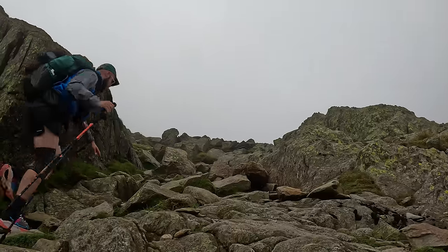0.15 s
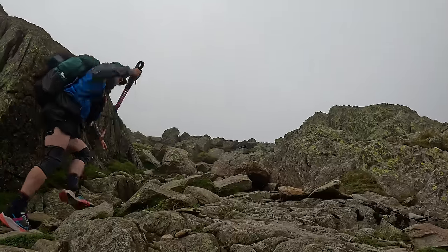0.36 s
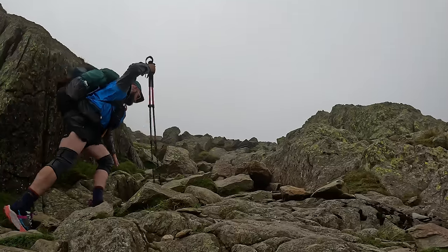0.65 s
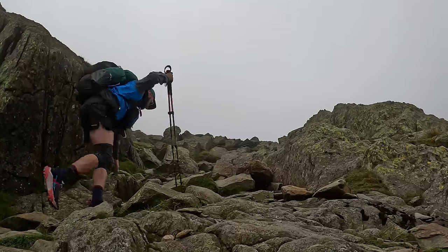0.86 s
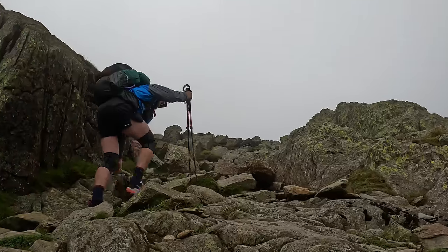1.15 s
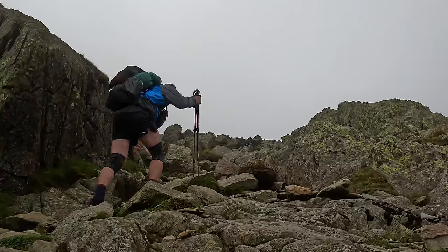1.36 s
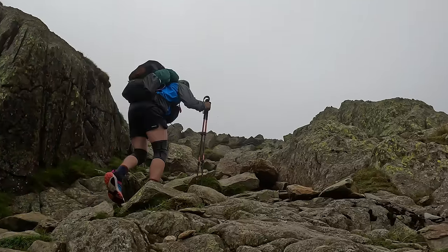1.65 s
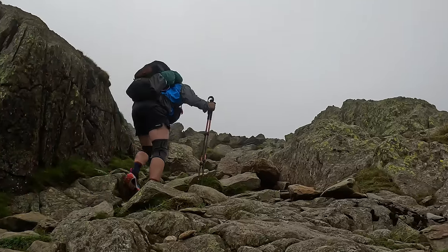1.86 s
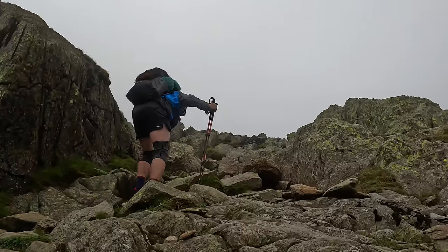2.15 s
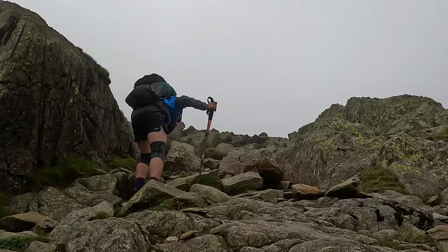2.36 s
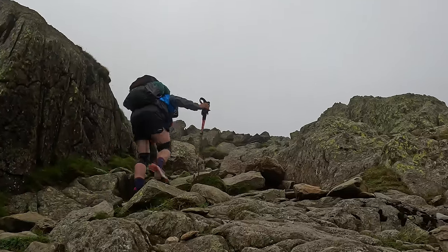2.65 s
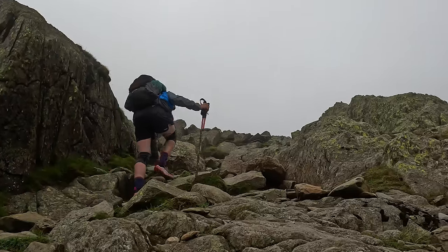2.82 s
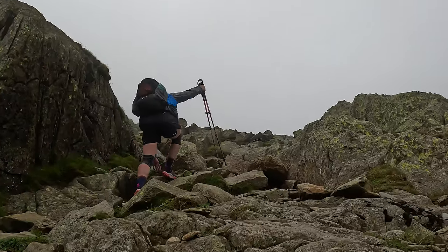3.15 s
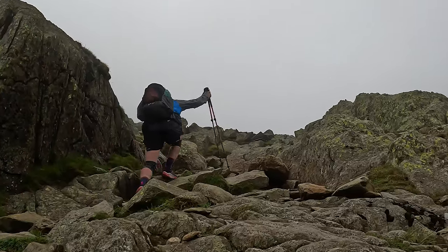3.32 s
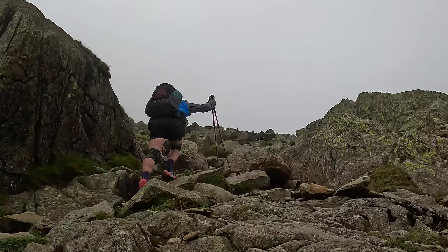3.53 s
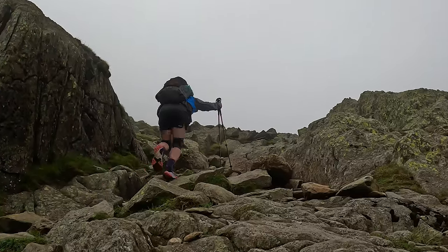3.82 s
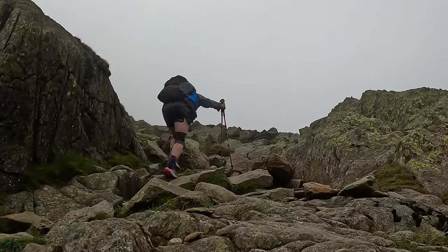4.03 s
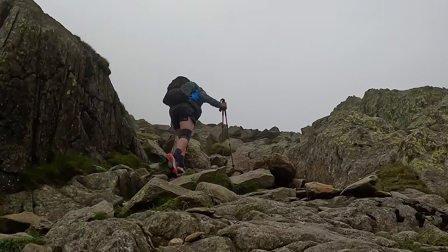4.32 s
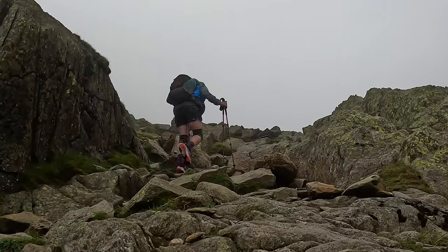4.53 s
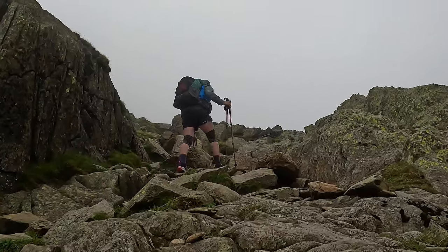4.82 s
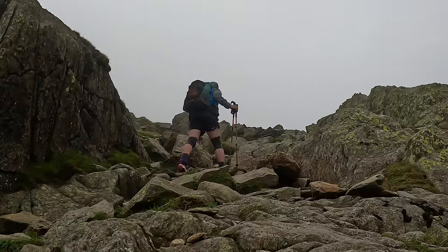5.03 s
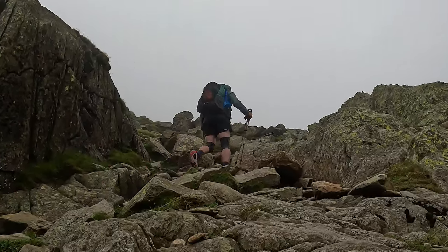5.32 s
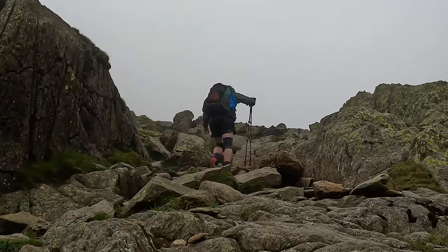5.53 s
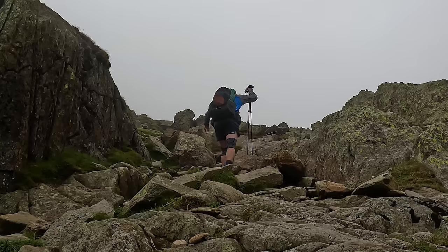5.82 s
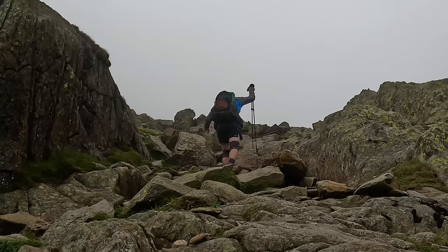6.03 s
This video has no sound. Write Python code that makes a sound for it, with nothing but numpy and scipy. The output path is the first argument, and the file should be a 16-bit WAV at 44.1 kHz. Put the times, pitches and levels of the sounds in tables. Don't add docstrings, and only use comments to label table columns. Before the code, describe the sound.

Outdoor boulder field, small camera on the ground, walker starting close on the left and moving toward the centre. From 0 to 0.3 s, pole tips tick and skip on stone, with a loud clack near 0.2, over nylon jacket and pack swishes and low rock rumble. Around 0.5-0.8 s come another hard pole strike, thuds, sole scrapes and crunching grit. At 1.1 s a boot and pole land together; near 1.4 s a heavy boulder knock brings gritty scuffs. From 1.8 to 3.2 s mainly rustle, duller steps, slides and pebble ticks. About 3.35 s a deep footfall and bright pole click stand out, then small shaft bumps. Two heel stamps with scuffing arrive around 4.3 s, softer steps and a pole tap near 5.1 s, and faint grit crunches at 5.9 s. Short rocky echoes, faint hiss, treble fading with distance.

```python
import sys
import numpy as np
from scipy import signal
from scipy.fft import rfft, irfft, next_fast_len
from scipy.io import wavfile
from scipy.ndimage import uniform_filter1d, map_coordinates

SR = 44100
rng = np.random.default_rng(int(sys.argv[2]) if len(sys.argv) > 2 else 0)


def unload_audio(sound):
    columns = np.transpose(np.atleast_2d(sound))
    steps = np.round(np.clip(columns, -1, 1) * 32767)
    wavfile.write(sys.argv[1], SR, steps.astype(np.int16))


def elevation(decibels):
    levels = np.asarray(decibels, float)
    return 10 ** (levels / 20)


N = 272272

# hz, level_db
CRACK_SPECTRUM = [(1500, -61.5), (3000, -9.5), (4200, -3), (6000, -6), (8500, -12.5), (11000, -27),
                  (16000, -74)]
CLACK_DB, CLACK_GROWS = 1.5, 0.63
DRAG_CLACK_DB, DRAG_CLACK_GROWS = 0.8, 0.5


def unit(x):
    return x / np.sqrt(np.mean(x ** 2) + 1e-20)


def along(points, hz):
    f, v = np.transpose(points)
    return np.interp(np.log(hz + 1), np.log(f + 1), v)


def curves(rows):
    s, *cols = np.transpose(rows)
    return [np.interp(np.arange(N) / SR, s, c) for c in cols]


def wobble(rate):
    knots = rng.standard_normal(int(N * rate / SR) + 4)
    return map_coordinates(knots, [np.arange(N) * rate / SR])


def filtered(x, response):
    n = x.shape[-1]
    m = next_fast_len(n + 8192)
    return irfft(rfft(x, m) * response(np.fft.rfftfreq(m, 1 / SR)), m)[..., :n]


def noise(spectrum, shape):
    return unit(filtered(rng.standard_normal(shape), lambda hz: elevation(along(spectrum, hz))))


def rush(spectrum, grain_db, grain_hz, apart):
    # hz, correlation
    alike = [(60, 0.29), (180, 0.8), (550, 0.95), (4970, 0.89), (15000, 0.4)]
    pair = rng.standard_normal((2, N)) * elevation(grain_db * wobble(grain_hz))

    def mid_side(hz):
        turn = np.arccos(np.clip(along(alike, hz) - apart, -1, 1)) / 2
        return elevation(along(spectrum, hz)) * [np.cos(turn), np.sin(turn)]

    mid, side = filtered(pair, mid_side)
    return unit(np.array([mid + side, mid - side]))


def ringing(modes, t, scatter_db, detune, spread=1):
    hz, db = np.transpose(modes)
    chance = rng.standard_normal((3, len(hz)))
    phase = 2 * np.pi * (np.outer(t, hz * (1 + detune * chance[0])) + spread * chance[1])
    return unit(np.sin(phase) @ elevation(db + scatter_db * chance[2]))


def add(track, s, sound):
    track[round(s * SR):][:len(sound)] += sound


def swells(s, db, rise_s, fall_s, rest_db):
    grid = np.arange(0, N + 64, 64) / SR
    late = grid[:, None] - s
    efforts_db = db - 10 * np.maximum(late / fall_s, -late / rise_s)
    power = elevation(rest_db) ** 2 + (elevation(efforts_db) ** 2).sum(1)
    return np.interp(np.arange(N) / SR, grid, np.sqrt(power))


def cloth():
    # peak_s, swish_db, hiss_over_swish_db, fall_10db_s
    reaches = [(.1, -49, -1.5, 0.52), (0.649, -46.5, -2.5, 0.2845), (.95, -51.5, 0, 0.3529),
               (1.55, -52.5, 0.5, 0.11), (1.832, -49.5, -2, 0.03), (2.44, -50.5, -4.5, 0.17),
               (2.62, -59, 2.5, 0.3), (2.9, -49, -1.5, .2), (3.72, -53.5, -1.5, 0.43),
               (4.008, -52, -2.5, -0.32), (4.6, -62, 3, .1), (5.42, -64, -4.5, 0.26), (5.78, -65, 5, 0.1),
               (1.95, -70, 9, 0.08)]
    # peak_s, swish_db, hiss_over_swish_db, fall_10db_s
    jolts = [(1.09, -44.5, -3, 0.16), (1.35, -42, -7.5, 0.2458), (2.17, -55, -7, 0.4),
             (3.344, -46.5, -3, 0.2), (4.19, -51, -1.5, 0.2), (4.34, -53, -2.5, 0.16),
             (4.9, -60, -1.5, 0.75), (5.119, -47.5, -7, 0.22), (5.87, -54, -6, 1)]
    # hz, level_db_per_hz
    swish_spectrum = [(400, -62), (750, -31), (1050, 5), (1750, 5), (3300, -3.5), (4600, -11.5),
                      (9000, -120)]
    # hz, level_db_per_hz
    hiss_spectrum = [(2800, -21), (3900, -6.5), (5500, 1.5), (8000, -4), (10000, -9.5), (12600, -25),
                     (16000, -62)]
    jolt_rise_s, still_db = 0.018, -70
    hiss_lingers = 1.19
    s, db, hiss_db, fall_s = np.transpose(reaches + jolts)
    rise_s = np.where(np.arange(len(s)) < len(reaches), 0.976 * fall_s, jolt_rise_s)
    coarse = swells(s, db, rise_s, fall_s, still_db)
    fine = swells(s, db + hiss_db, hiss_lingers * rise_s, hiss_lingers * fall_s, still_db)
    folds = elevation(wobble(14))
    swish = coarse * folds * rush(swish_spectrum, grain_db=1.0, grain_hz=90.9, apart=0.21)
    hiss = fine * folds * rush(hiss_spectrum, grain_db=1.0, grain_hz=162.0, apart=0.043)
    return swish + hiss


def load():
    # peak_s, boom_db, rumble_db, grind_db
    shifts = [(.06, -44, -52, -58), (.2, -49, -61, -64), (.6, -49.5, -69.5, -53), (.68, -59.5, -49, -50.5),
              (1.13, -38, -49.5, -53), (1.4, -37, -60, -57), (1.48, -52.5, -48.5, -54),
              (1.82, -49.5, -61.5, -78), (2.221, -54.5, -54.5, -69.5), (2.52, -53, -56.5, -58),
              (2.88, -58, -70, -72), (3.02, -51.5, -53.5, -60), (3.388, -43, -44.5, -52),
              (4.26, -43, -69, -60.5), (4.62, -60, -72, -75), (5.12, -54, -47, -48),
              (5.32, -48, -55, -58.5), (5.56, -50, -67, -67), (5.72, -50, -71, -72), (5.91, -40, -50, -64),
              (6.09, -46, -52.5, -56)]
    # rise_10db_s, fall_10db_s, rest_db
    settling = [(0.02, 0.06, -75), (0.0846, 0.1031, -65), (0.08, 0.1119, -68)]
    # hz, level_db_per_hz
    boom_spectrum = [(50, -29), (72, 2), (105, 5.5), (140, 6), (190, -31), (400, -120)]
    # hz, level_db_per_hz
    rumble_spectrum = [(50, -53), (100, -32), (150, 1), (270, -1), (400, -14), (900, -120)]
    # hz, level_db
    grind_spectrum = [(200, -28), (330, -10), (500, 5), (800, 0), (1200, -9), (2500, -50.5), (5000, -88.5)]
    s, *levels_db = np.transpose(shifts)
    peaks_s = (s - 0.032, s, s)
    deep, low, rough = (swells(at, db, *law) for at, db, law in zip(peaks_s, levels_db, settling))
    sway = rush(boom_spectrum, grain_db=2.0, grain_hz=9.8, apart=-0.4)
    sway_power = np.abs(uniform_filter1d((sway ** 2).mean(0), SR // 20))
    boom = deep * sway / np.sqrt(sway_power + 0.13)
    rumble = low * rush(rumble_spectrum, grain_db=1.5, grain_hz=24.9, apart=0.024)
    grind = rough * rush(grind_spectrum, grain_db=3.0, grain_hz=69.0, apart=0.38)
    return boom + rumble + grind


def thuds(blows):
    out, t = np.zeros(N + SR), np.arange(SR // 2) / SR
    for s, db, hz, knock_db, knock_hz, t60 in blows:
        modes = [(0.741 * hz, -5), (0.872 * hz, -4), (hz, 0), (1.25 * hz, -4), (1.4 * hz, -5)]
        ground = ringing(modes, t, scatter_db=-2.0, detune=0.017, spread=0.131)
        swing = elevation(-3.5 - 60 * t / (0.9 * t60)) * (1 - np.exp(-t / 0.0043)) * ground
        hollow = [(0.25 * knock_hz, -50), (0.725 * knock_hz, -9), (knock_hz, 0),
                  (1.1 * knock_hz, -8), (2.0 * knock_hz, -18), (9 * knock_hz, -120)]
        knock_fade = elevation(knock_db + 4.5 - 60 * t / (0.74 * t60)) * (1 - np.exp(-t / 0.00179))
        add(out, s, elevation(db) * (swing + knock_fade * noise(hollow, len(t))))
    return out[:N]


def rocking_stones():
    # start_s, peak_db, ground_pitch_hz, knock_db, knock_hz
    wobbles = [(0.0, -46, 250, -8, 400), (0.21, -42, 260, -8, 420), (0.64, -34, 220, -12, 500),
               (0.688, -36, 250, -8, 600), (0.766, -24, 320, -14, 450), (1.095, -28, 150, -20, 450),
               (1.148, -33, 220, -10, 550), (1.35, -31, 220, -8, 550), (1.367, -28, 200, -8, 600),
               (1.394, -24.5, 230, -12, 550), (2.19, -29, 205, -18, 600), (2.457, -40, 300, -4, 550),
               (2.9, -49, 200, -8, 500), (3.172, -31, 280, -17, 500), (3.19, -34, 270, -14, 600),
               (3.315, -36, 180, -20, 400), (5.03, -39, 300, -4, 470), (5.14, -36, 280, -4, 600),
               (5.174, -43, 220, 0, 650), (5.232, -40, 250, -6, 600), (5.273, -35, 260, -14, 500),
               (5.665, -50, 250, -5, 550), (5.95, -40, 200, -8, 600)]
    return thuds([(*row, 0.08) for row in wobbles])


def clicks(blows):
    # hz, level_db
    shaft_modes = [(1090, -4), (1290, -2.5), (1430, -6.5), (1560, -0.5), (1740, 1), (2030, -19)]
    # hz, level_db
    stone_modes = [(2250, 1.5), (2500, -0.5), (2750, 2), (2990, -0.5), (3240, -0.5), (3480, -1)]
    out, t = np.zeros(N + SR), np.arange(SR // 6) / SR

    def fade(share, t60):
        return elevation(-60 * t / (share * t60)) * (1 - np.exp(-t / (0.019 * share * t60)))

    for s, db, hz, clack_db, crack_db, t60 in blows:
        jangle = elevation(1.74 * np.tanh(noise([(100, -3), (400, -6.5), (900, -61.5)], len(t))))
        struck = ringing(shaft_modes + [(hz, 4), (760, -14)], t, scatter_db=2.0, detune=0.0077)
        ring = elevation(-2) * fade(0.562, t60) * struck
        clack = elevation(clack_db - 0.5) * fade(0.72, t60) * ringing(stone_modes, t, scatter_db=3, detune=0.051)
        distant = [(f, g - 3.5 * (s - 1.5) * f / 1e4) for f, g in CRACK_SPECTRUM]
        tick_and_fizz = fade(0.15, t60) + elevation(-8.0) * fade(0.94, t60)
        crack = elevation(crack_db + 5.5) * tick_and_fizz * noise(distant, len(t))
        add(out, s, elevation(db) * (jangle * (ring + clack) + crack))
    return out[:N]


def contacts():
    # start_s, ring_db, main_ring_hz, hardness_db, t60_s
    tips = [(0.053, -31.5, 1700, 6.5, 0.022), (0.0762, -28, 1700, 4.5, 0.024),
            (0.1663, -23, 1710, 4, 0.044), (0.1833, -7.5, 1782, -10.5, 0.016),
            (0.291, -40.5, 1460, -1, 0.041), (0.516, -36.5, 1650, -1.5, 0.027),
            (0.6112, -8.5, 2040, -17, 0.044), (0.7562, -17, 1688, -12, 0.02),
            (0.9329, -40.5, 1960, 9, 0.0278), (1.0718, -11.5, 1290, -5.5, 0.046),
            (1.203, -31, 1330, -14.5, 0.027), (1.426, -29, 1293, -11, 0.09),
            (1.5208, -36, 1440, 0.5, 0.025), (1.564, -35.5, 1843, -9.5, 0.04),
            (3.3506, -10.5, 1759, -9, 0.026), (3.4228, -42.5, 2170, -4, 0.069),
            (3.449, -38, 1590, -10, 0.068), (3.6103, -32, 1766, -11.5, 0.05),
            (3.6728, -39, 1540, -10, 0.063), (4.4234, -37.5, 1790, -6.5, 0.0194),
            (4.4446, -35, 1870, -4.5, 0.021), (4.4945, -28.5, 1030, -1.5, 0.013),
            (4.6418, -44.5, 1340, 3.5, 0.024), (5.025, -20.5, 1724, -12, 0.061)]
    # start_s, ring_db, main_ring_hz
    skips = [(0.171, -16, 1700), (0.1975, -27, 1730), (0.212, -20.5, 1600), (0.6177, -13.5, 1387),
             (1.1147, -28, 1340), (1.2581, -37, 1920), (1.286, -34.5, 1690), (1.2969, -35.5, 1910),
             (3.2253, -36, 1273), (3.63, -26, 1620)]
    # clack_db, crack_db, t60_s
    skip_blow = (-10.5, -21, 0.026)
    # start_s, ring_db, main_ring_hz
    bumps = [(3.561, -26.5, 1422), (5.3079, -35, 1063), (5.3776, -34, 1510), (5.8591, -23.5, 1672),
             (6.0584, -29.5, 1695), (6.1545, -30, 1200)]
    # clack_db, crack_db, t60_s
    bump_blow = (-18.5, -20.5, 0.045)
    blows = [(s, db, hz, CLACK_DB + CLACK_GROWS * hard, hard, t60) for s, db, hz, hard, t60 in tips]
    blows += [(*row, *skip_blow) for row in skips]
    blows += [(*row, *bump_blow) for row in bumps]
    return sorted(blows)


def scuffs(strokes, backwards=False):
    out, t = np.zeros(N + SR), np.arange(SR // 5) / SR

    def grit(spectrum):
        clumps = elevation(2.73 * noise([(20, -3), (150, 2.5), (500, -48.0)], len(t)))
        return unit(clumps * noise(spectrum, len(t)))

    for s, db, hz, clack_db, crack_db, t60 in strokes:
        swell = elevation(-60 * t / t60) * (1 - np.exp(-t / (0.0736 * t60)))
        body = grit([(0.075 * hz, -60), (.5 * hz, -16), (0.622 * hz, -5), (hz, 0),
                     (1.493 * hz, -6), (1.943 * hz, -22), (6 * hz, -90)])
        scrape = grit([(900, -58), (1800, -25.5), (2300, 6.5), (3300, 1.5), (4200, -33.5), (9000, -88.5)])
        crack = elevation(crack_db + 4) * grit(CRACK_SPECTRUM)
        stroke = elevation(db - 3) * swell * (body + elevation(clack_db + 1.5) * scrape + crack)
        if backwards:
            add(out, s - t[-1], stroke[::-1])
        else:
            add(out, s, stroke)
    return out[:N]


def rubs():
    # start_s, body_db, body_hz, hardness_db, t60_s
    drags = [(0.1364, -40, 1690, 6.5, 0.0605), (0.4334, -42, 1560, -9, 0.079),
             (0.4575, -31.5, 1660, -17.5, 0.023), (0.574, -23.5, 1100, -27, 0.034),
             (0.752, -29, 1500, -14, 0.13), (0.7847, -19.5, 1040, -21, 0.0232),
             (1.1466, -26, 1507, -18, 0.062), (1.3345, -29, 850, -24, 0.07), (1.3692, -23, 957, -21, 0.076),
             (1.798, -46, 1460, -0.5, 0.16), (2.1722, -31, 1290, -19.5, 0.0257),
             (2.274, -41, 1280, -5.5, 0.064), (2.4173, -28, 1340, -18.5, 0.053),
             (2.4736, -31, 1080, -20, 0.092), (2.497, -34, 1360, -9, 0.061), (2.937, -38, 1300, -3.5, 0.07),
             (2.9965, -28.5, 1010, -20, 0.0426), (3.4994, -36, 1540, -12, 0.033),
             (4.32, -40, 1516, -4, 0.057), (4.9306, -39.5, 1750, -17.5, 0.038),
             (5.1135, -25.5, 1250, -16.5, 0.05), (5.228, -41, 1096, -8, 0.0645),
             (5.2553, -46, 1230, 3.5, 0.07), (5.6702, -35, 1213, -27, 0.0417)]
    # start_s, body_db, body_hz, grit_db, t60_s
    crunches = [(0.528, -31, 1710, -6, 0.066), (1.1725, -32.5, 1990, 0.5, 0.059),
                (1.3885, -21, 1910, -13.5, 0.0505), (1.475, -20, 1080, -16, 0.03),
                (2.2196, -31.5, 1100, -12.5, 0.039), (2.381, -34, 700, -12, 0.032),
                (3.1565, -34, 1000, -19, 0.12), (3.1788, -39, 1920, -6.5, 0.041),
                (4.183, -39, 1027, -15, 0.117), (4.2002, -24.5, 1340, -12.5, 0.058),
                (4.333, -28.5, 1360, -10, 0.072), (4.3675, -30, 1000, -14, 0.021),
                (5.1747, -40, 1582, -14.5, 0.046), (5.895, -26, 1690, -15, 0.0633),
                (5.9131, -29, 935, -17, 0.056)]
    strokes = [(s, db, hz, DRAG_CLACK_DB + DRAG_CLACK_GROWS * hard, hard, t60)
               for s, db, hz, hard, t60 in drags]
    strokes += [(s, db, hz, -30, grit_db, t60) for s, db, hz, grit_db, t60 in crunches]
    return sorted(strokes)


def footfalls():
    # start_s, peak_db, ground_pitch_hz, knock_db, knock_hz
    landings = [(0.139, -36.5, 199.4, -8, 340), (0.574, -21, 151, -8, 567), (1.074, -21, 222.5, -18.5, 503),
                (1.335, -23.5, 235, -8, 692), (1.821, -41.5, 97.7, -26, 609), (2.149, -32, 213.6, -12, 728),
                (2.473, -28.5, 217.5, -11, 820), (2.995, -27.5, 198, -8, 569), (3.357, -15, 162, -13, 305),
                (3.56, -37.5, 186, -13, 734), (3.603, -29.5, 200.5, -21, 417),
                (3.629, -33.5, 180, -30, 926), (5.069, -34.5, 181, -21, 540), (5.109, -32.5, 158, -5, 520),
                (5.132, -30.5, 237.5, -7, 605), (5.851, -39, 99, -23, 925.3), (5.895, -30.5, 172, -8, 569)]
    # start_s, peak_db, ground_pitch_hz, knock_db, t60_s
    tilts = [(0.612, -30, 230, -5.5, .13), (0.76, -23.5, 288.3, -12.5, .1), (0.788, -29, 219, -18, .1),
             (1.376, -12, 160, -16, .095), (1.431, -36.5, 205, -2, .13), (1.47, -24.5, 212.4, -20.5, .09),
             (2.177, -25, 212, -24, .11), (2.217, -27.5, 221, -18.5, .11), (2.377, -23, 225, -16, .09),
             (2.418, -36, 206.9, -15.5, .13), (3.157, -28, 275, -14, .1), (4.205, -27.5, 233.5, -15.5, .13),
             (5.041, -33, 310, -16, .12)]
    # start_s, peak_db, ground_pitch_hz, knock_db, knock_hz
    stamps = [
        (4.333, -24, 300, -12, 560),
        (4.366, -20.5, 230.1, -11, 555),
        (5.256, -31.5, 249, -11, 649),
    ]
    usual_db, usual_t60_s, shorter = -26, 0.13, 0.057
    tilt_knock_hz, stamp_t60_s = 310.2, 0.075
    blows = [(*row, usual_t60_s * np.exp(shorter * (usual_db - row[1]))) for row in landings]
    blows += [(s, db, hz, knock_db, tilt_knock_hz, t60) for s, db, hz, knock_db, t60 in tilts]
    blows += [(*row, stamp_t60_s) for row in stamps]
    return sorted(blows)


def rocks(x):
    # hz, t60_s
    echo_decay = [(150, 0.26), (1500, 0.0767), (8000, 0.064)]
    out, step = np.zeros((2, N + SR)), SR // 4
    for start in range(0, N, step):
        hz, t, z = signal.stft(rng.standard_normal((2, SR // 4)), SR, nperseg=256)
        decay = elevation(-60 * t / along(echo_decay, hz)[:, None])
        tail = signal.istft(z * decay, SR, nperseg=256)[1]
        tail[1] = 1.0 * tail[0] + 1.2 * tail[1]
        wet = signal.fftconvolve(x[None, start:start + step], tail / np.linalg.norm(tail[0]), axes=1)
        out[:, start + 90:start + 90 + wet.shape[1]] += wet
    return out[:, :N]


def loose_grit():
    # start_s, ring_db, main_ring_hz, hardness_db
    pebbles = [(0.609, -30, 1500, -14), (0.664, -35, 2000, -10), (0.677, -35, 1100, -18),
               (0.689, -31, 1000, -18), (1.143, -30, 1100, -14), (1.2215, -36, 1500, -10),
               (1.234, -40, 1000, -18), (1.35, -30, 1650, -26), (1.445, -33, 1500, -18),
               (1.457, -35, 1500, -14), (1.805, -44, 1700, 0), (1.865, -45, 1500, -8),
               (2.008, -55, 1700, 2), (2.172, -40, 2500, -10), (2.255, -44, 2000, -6),
               (2.305, -45, 3000, -3), (3.262, -45, 1400, -14), (3.34, -33, 1500, -16),
               (3.458, -40, 1500, -8), (3.585, -40, 1300, -16), (3.695, -39, 1500, -14),
               (4.295, -48, 1800, -8), (5.052, -42, 1700, -10), (5.208, -42, 1100, -20),
               (5.712, -50, 1500, -10), (5.733, -54, 1700, 0), (5.745, -53, 1700, -2),
               (5.788, -55, 1500, 0), (5.865, -38, 1700, 0), (5.952, -40, 1100, -20),
               (5.998, -44, 1100, -20), (0.757, -25, 2800, -24), (1.074, -21, 3200, -14),
               (1.084, -22, 1430, -20), (1.098, -27, 1400, -20), (1.152, -26, 1500, -20),
               (1.369, -29, 2700, -16)]
    # catch_s, body_db, body_hz, hardness_db, swell_60db_s
    slides = [(0.758, -30, 1500, -12, .07), (1.15, -38, 1400, -14, .08), (1.85, -49, 1500, -2, .25),
              (2.48, -35, 900, -20, .12), (4.204, -36, 1100, -16, .1), (4.336, -39, 1300, -3, .1),
              (5.115, -41, 600, -24, .12), (5.675, -46, 1400, -10, .1)]
    ticks = [(s, db, hz, CLACK_DB + CLACK_GROWS * hard, hard, 0.035) for s, db, hz, hard in pebbles]
    strokes = [(s, db, hz, DRAG_CLACK_DB + DRAG_CLACK_GROWS * hard, hard, t60)
               for s, db, hz, hard, t60 in slides]
    return clicks(ticks) + scuffs(strokes, backwards=True)


def placed(x, body_db, treble_db, air_db):
    # hz, side_db
    width = [(3300, 0), (3800, -24), (5600, -24), (6200, -15), (9800, -14), (10800, 0)]
    mid = x.mean(0)
    side = filtered((x[0] - x[1]) / 2, lambda hz: elevation(along(width, hz)))
    pair = np.array([mid + side, mid - side])
    treble = filtered(pair, lambda hz: hz ** 4 / (hz ** 4 + 3000 ** 4))
    air = filtered(pair, lambda hz: hz ** 12 / (hz ** 12 + 10500. ** 12))
    return elevation(body_db) * (pair - treble) + elevation(treble_db) * (treble - air) + elevation(air_db) * air


def scene():
    # time_s, body_db, treble_db, air_db
    sideways = [(0, 3, 5, 7), (.9, 3.5, 3.5, 6), (1.1, 0.5, 2.6, 5), (4.4, 0.5, 1.85, 3),
                (6.17, -0.5, 0.76, 2)]
    rustle, weight = cloth(), load()
    stones = rocking_stones()
    sharp = clicks(contacts()) + scuffs(rubs())
    dull = thuds(footfalls())
    grit = loose_grit()
    walker = sharp + rustle + elevation(-9.5) * rocks(sharp + 0.54 * dull)
    underfoot = grit + elevation(-12) * rocks(grit + 0.54 * stones)
    pans_db = [db * np.array([[.5], [-.5]]) for db in curves(sideways)]
    return placed(walker + underfoot, *pans_db) + dull + stones + weight


def band_limit(x):
    return signal.sosfilt(signal.butter(12, 16500, fs=SR, output="sos"), x)


def record(dry):
    # hz, level_db_per_hz
    capsule = [(200, -14), (8500, -13.5), (10500, -2), (12500, -5)]

    def notch(hz):
        return 1 - .93 * 1j * hz * 380 / (3670 ** 2 - hz * hz + 1j * hz * 380)

    def band_limits(hz):
        low_cut = 1 / (1 + 1.183 * 62 / (1j * hz + 1e-9) - (62 / (hz + 1e-9)) ** 2) ** 3
        return low_cut / (1 + (hz / 14800) ** 20)

    hiss = elevation(-81.5) * noise(capsule, dry.shape)
    mix = filtered(dry + hiss, lambda hz: notch(hz) * band_limits(hz))
    return band_limit(mix)


dry = scene()
out = record(dry)
unload_audio(out)
```